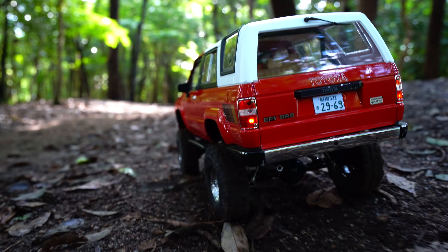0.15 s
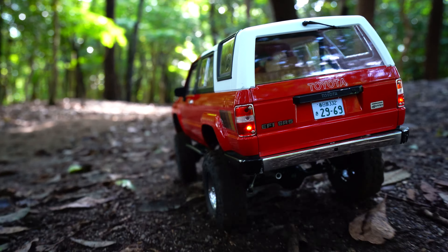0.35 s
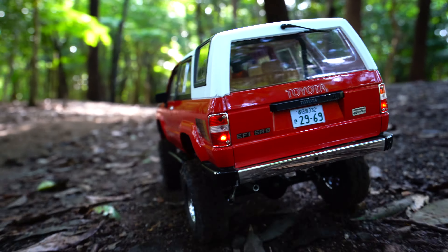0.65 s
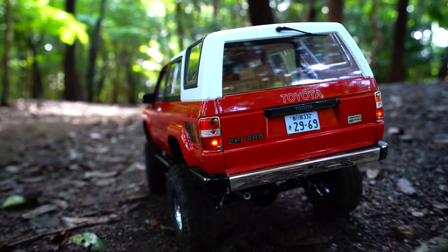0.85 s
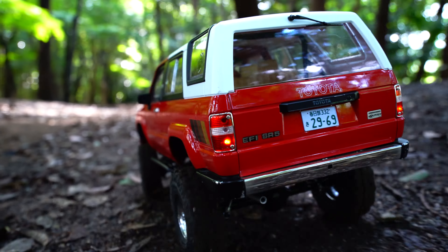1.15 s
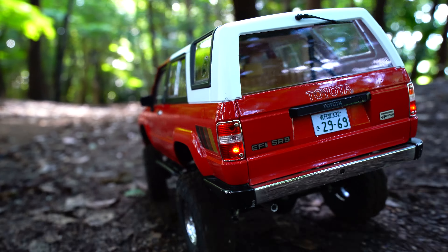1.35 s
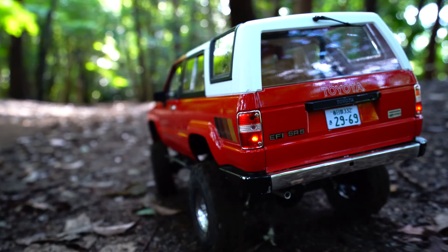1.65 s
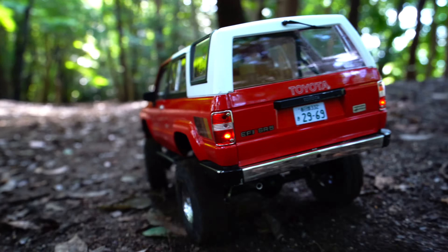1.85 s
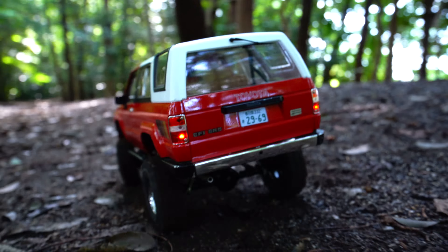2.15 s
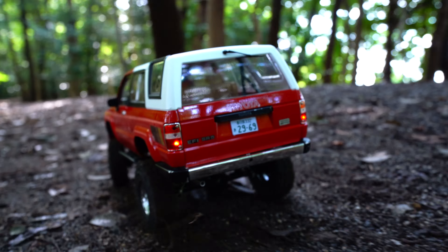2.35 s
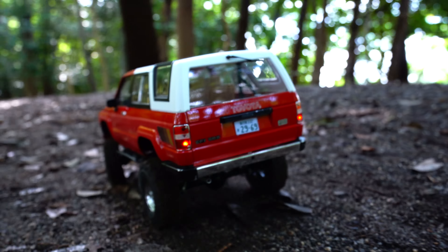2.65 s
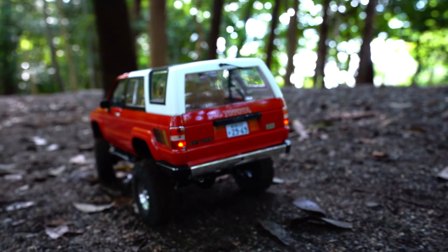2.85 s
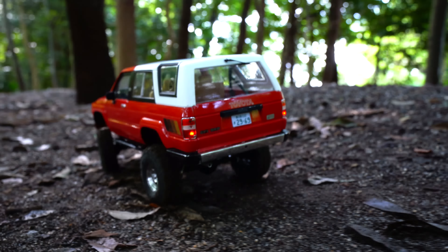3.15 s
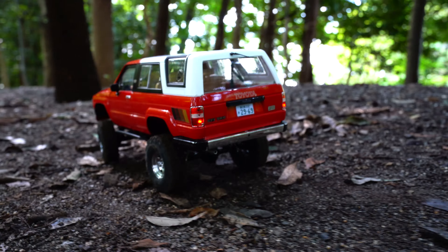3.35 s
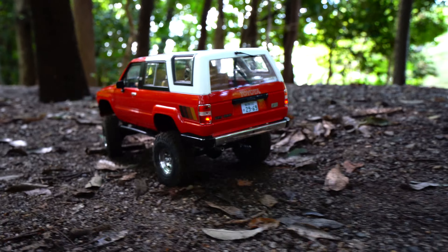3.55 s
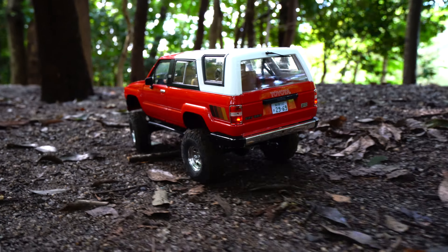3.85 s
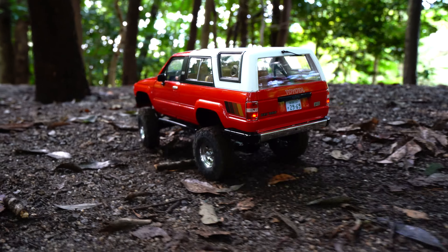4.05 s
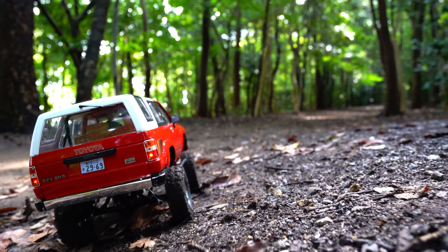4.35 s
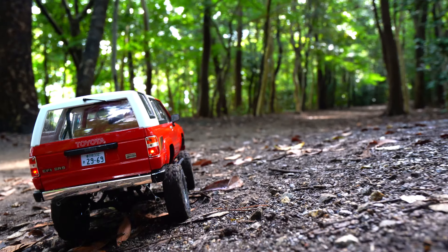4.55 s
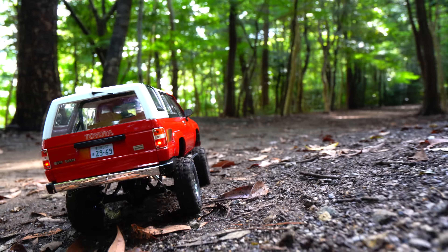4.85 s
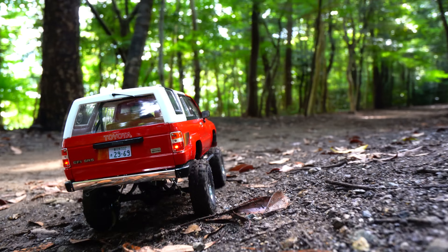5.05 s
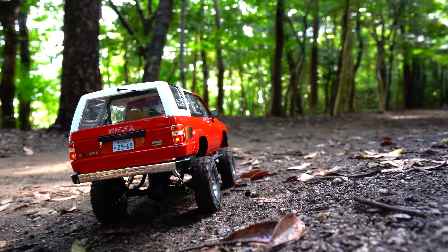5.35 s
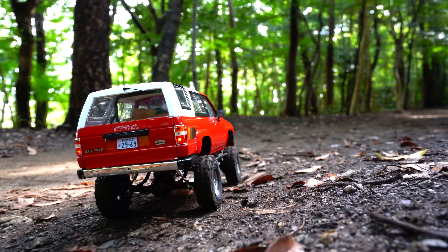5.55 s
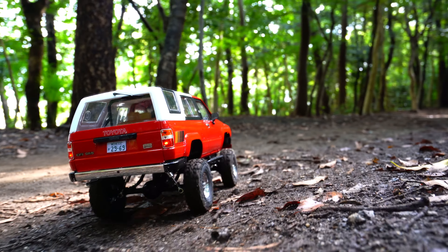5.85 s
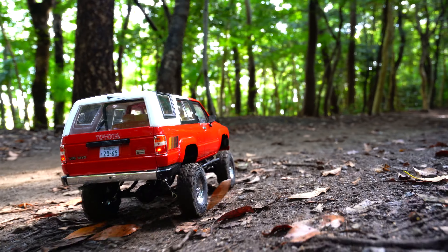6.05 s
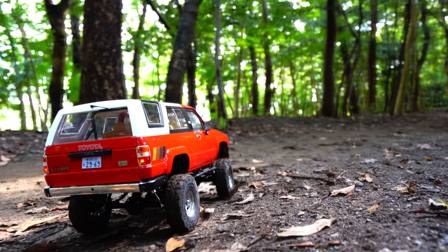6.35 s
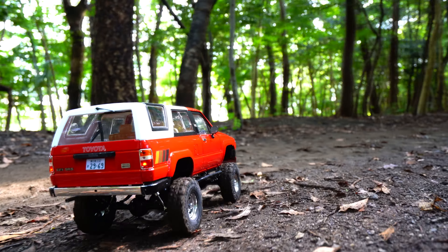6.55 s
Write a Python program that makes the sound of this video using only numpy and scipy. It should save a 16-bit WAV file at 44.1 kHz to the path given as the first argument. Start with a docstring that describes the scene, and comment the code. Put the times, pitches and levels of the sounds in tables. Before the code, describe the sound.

From 0 to 6.7 seconds a dense, high cicada chorus sizzles loudly and almost evenly, over a soft bed of forest air. Beneath it a small electric model truck crawls over soft leafy soil: a thin, wavering gear whine with rapid small surges, low tyre rumble and faint crackle. A light knock comes at 0.2, with duller thuds near 1.2 and 1.4. From 1.5 the whine climbs and rasps, peaking around 1.9, then slides down by 2.7 and keeps fluttering. Soft bumps fall near 2.2. Closer shrill insects gradually join. At 4.3 everything dips for an instant at a cut; then the rolling is grittier. A thin distant cicada winds upward from 4.9. The whine rises again around 5.5 to 5.9, with a sharper plastic knock near 5.75, then drops and wavers to the end. Dry, centred, single microphone.

```python
"""A small electric model truck crawls over a forest floor under a dense cicada chorus, in two scenes.
First soft soil: gears whine with the throttle and rasp under load, tyres rumble, the chassis knocks.
The whine peaks in pitch near 1.9 s; closer insects then slowly join the filtered-click chorus.
At 4.29 s the level dips for an instant at the cut to a second scene, where the rumble is grittier;
a far cicada winds up from 4.9 s. Whine and far cicada are gliding sines, forest is filtered noise."""
import sys
import numpy as np
from scipy import signal
from scipy.fft import rfft, irfft, next_fast_len
from scipy.io import wavfile

SR = 44100
rng = np.random.default_rng(int(sys.argv[2]) if len(sys.argv) > 2 else 0)


def master_out(mix):
    """Clip the mix to full scale and print it as 16-bit PCM to the path in sys.argv[1]."""
    frames = np.transpose(np.atleast_2d(mix))
    ceiling = np.clip(frames, -1, 1)
    pcm = np.round(ceiling * 32767).astype(np.int16)
    wavfile.write(sys.argv[1], SR, pcm)


N = 295029
TIME = np.arange(N) / SR
SCENE_CUT_S = 4.287


def amp(db):
    """Decibels to gain."""
    return 10 ** (np.asarray(db) / 20)


def unit(x):
    """Scales to rms 1."""
    return x / np.sqrt(np.mean(x ** 2) + 1e-20)


def curves(rows):
    """Each column of a table, joined by straight lines in time."""
    s, *columns = np.transpose(rows)
    return [np.interp(TIME, s, column) for column in columns]


def colour(x, points):
    """Filters x by a spectrum, linear in dB over log frequency; rms 1."""
    hz, db = np.transpose(points)
    size = next_fast_len(N, True)
    bin_hz = np.fft.rfftfreq(size, 1 / SR)
    gain = amp(np.interp(np.log(bin_hz + 1), np.log(hz), db))
    return unit(irfft(rfft(x, size) * gain, size)[:N])


def wander(hz):
    """Smooth random drift up to about hz; rms 1."""
    size = next_fast_len(N, True)
    bin_hz = np.fft.rfftfreq(size, 1 / SR)
    gain = 1 / np.sqrt(1 + (bin_hz / hz) ** 4)
    return unit(irfft(rfft(rng.standard_normal(size)) * gain, size)[:N])


def grains(per_s, spread_db):
    """Random clicks of uneven size and either sign; rms 1."""
    size = amp(spread_db * np.minimum(rng.exponential(1, N), 4))
    sign = rng.choice([-1, 1], N)
    return unit(size * sign * (rng.random(N) < per_s / SR))


def resonate(x, hz, width_hz):
    """One resonance of peak gain 1."""
    return signal.lfilter(*signal.iirpeak(hz, hz / width_hz, fs=SR), x)


def bell(s, half_length_s, squareness=1):
    """One smooth swell of height 1, centred on time s; squareness flattens its top."""
    return np.exp(-np.minimum(((TIME - s) / half_length_s) ** 2, 30) ** squareness)


# Gear speed set by the throttle. Each row: time in seconds, tooth rate in Hz.
THROTTLE_CURVE = [(0.0, 654), (0.53, 687), (0.88, 669.6), (1.31, 710.5), (1.54, 783), (1.94, 1142),
                  (2.14, 1024), (2.29, 850), (2.66, 753.6), (3.3, 719), (4.06, 729.5), (4.26, 659.3),
                  (5.03, 640), (5.52, 872.5), (5.91, 869), (6.23, 680), (6.39, 763), (6.69, 748)]
# The motor surges as a wheel comes free, or sags as it snags. Each row: centre in seconds,
# half length in seconds, change of tooth rate in Hz, extra bite in dB, strain in dB.
MOTOR_SURGES = [(0.087, .03, -65.5, -0.5, 0), (0.189, 0.041, 87, 10, 1.5), (.427, 0.038, 47, 4.5, 4),
                (0.765, 0.033, 55, 0, 6), (0.837, .018, -44.5, 2, -4), (0.904, 0.019, -42, 2, 0),
                (1.105, 0.025, 72, 1, 0), (1.248, .035, 87.5, 0.5, 7), (1.371, 0.042, 107, 0, 9),
                (1.484, .027, 93.5, 0.5, 7.5), (1.616, .027, 104.5, -5, -1), (1.665, 0.035, -14.5, -0.5, 5),
                (1.755, 0.025, 81, -2, 1), (2.055, 0.024, -40, -2, -1), (2.205, .02, 25, 6.5, -1),
                (2.45, 0.025, 37, 1, 1), (2.572, 0.033, 71.5, 3.5, 1.5), (2.742, 0.0247, 14.5, 7, -2),
                (2.854, 0.024, 62.5, -1, 8.5), (2.963, .031, 54.5, 5, 1.5), (3.1, 0.04, 76, 0.5, 3),
                (3.182, 0.043, 80, 4.5, -1), (3.307, 0.035, 87.5, 6, 0), (3.479, .055, 53, 9, 3),
                (3.643, 0.027, 99.5, 1.5, 0), (3.852, 0.029, 91.5, 11.5, -2), (4.2, .034, 85.5, 8.5, 0),
                (4.636, .053, 51.5, -2, 0), (4.797, .018, 9, 9, 0), (4.841, .038, 85.5, -3, -3),
                (5.047, 0.059, 128, 0, 12), (5.179, .027, 71, -1, 3), (5.297, .027, 97, 1, 0),
                (5.395, 0.037, 43.5, 2.5, -1), (5.664, .028, -52, 0.5, -1), (5.733, 0.048, 43.5, 3, -4),
                (6.14, 0.048, 71, 1, -1), (6.447, .037, 82, 10.5, 0), (6.576, 0.027, 88.5, 3, -1)]
# A wheel's load comes on and lets go faster than the speed can follow.
LOAD_SQUARENESS = 2
# Whine before shell and load gains. Each row: time in seconds, tone at the tooth rate in dB,
# tooth bite at its octave in dB.
WHINE_LEVELS = [(0, -42.5, -49), (.5, -40.5, -47.5), (.9, -41.5, -49.5), (1.3, -42, -41),
                (1.68, -43, -42.5), (2.1, -42, -46), (2.45, -42.5, -40.5), (2.8, -42.5, -42.5),
                (3.3, -44, -45.5), (3.7, -42.5, -48), (4.05, -38, -48), (4.4, -46.5, -48),
                (5.1, -44.5, -48.5), (5.4, -38, -42.5), (5.96, -42, -45), (6.04, -47, -58),
                (6.42, -40.5, -49.5), (6.69, -43.5, -53)]
# Upper overtones of the bite. Each row: multiple of the tooth rate, relative level in dB.
BITE_OVERTONES = [(3, -8), (4, -10), (5, -10.5), (6, -14.5)]
# Dry scrape of the teeth, louder when the truck is near. Each row: time in seconds, level in dB.
RASP_LEVELS = [(0, -46), (.6, -51), (1.3, -47.5), (1.7, -38.5), (2.55, -42.5), (2.7, -53.5), (3.1, -41),
               (3.4, -58), (4.9, -54), (5.3, -45.5), (5.9, -42), (6.1, -45.5), (6.69, -43.5)]
# The meshing gears sing out for a moment. Each row: centre in seconds, extra tone in dB.
GEAR_SINGS = [(.06, 3.5), (.585, 2.5), (.795, 9), (.905, 5.5), (.97, 6.5), (1.651, 11), (1.79, 10),
              (1.915, 2), (2.01, 5), (2.82, 6), (2.91, 9), (4.04, 5), (4.88, 3), (5.18, 6), (5.72, 1),
              (5.925, 3.5), (6.39, 7.5)]
SING_HALF_LENGTH_S, SING_BITE_SHARE = 0.022, 0.4
# The load swings once per turn of the drive shaft, and the whine throbs with it.
TEETH_PER_TURN = 92
THROB_DB, BITE_THROB_DB, THROB_SAG_FRACTION = 1.55, 2.0, 0.0119


def gears():
    """Meshing teeth sing; load sharpens their contact, adding overtones and a rasp."""
    throttle_hz, = curves(THROTTLE_CURVE)
    tone_db, bite_db = curves(WHINE_LEVELS)
    rasp_db, = curves(RASP_LEVELS)

    mesh_hz, surge_db, strain_db = throttle_hz, 0, 0
    for s, half_length_s, change_hz, extra_bite_db, extra_strain_db in MOTOR_SURGES:
        mesh_hz = mesh_hz + change_hz * bell(s, half_length_s)
        load = bell(s, 0.92 * half_length_s, LOAD_SQUARENESS)
        surge_db = surge_db + extra_bite_db * load
        strain_db = strain_db + extra_strain_db * load

    shaft_angle = 2 * np.pi * np.cumsum(mesh_hz) / TEETH_PER_TURN / SR
    throb = np.sin(shaft_angle + .7 * wander(hz=4.06))
    sing_db = sum(db * bell(s, SING_HALF_LENGTH_S) for s, db in GEAR_SINGS)
    tone_db = tone_db + sing_db + shell(mesh_hz) + THROB_DB * throb
    bite_db = bite_db + surge_db + SING_BITE_SHARE * sing_db + BITE_THROB_DB * throb

    # the speed trembles as the tread grips and slips
    tremble = .014 * wander(hz=35)
    tooth_hz = mesh_hz * (1 + tremble - THROB_SAG_FRACTION * throb)
    angle = 2 * np.pi * np.cumsum(tooth_hz) / SR
    # the twelve-tooth pinion runs slightly off centre, once a turn
    angle = angle + .15 * np.sin(angle / 12 + .6 * wander(hz=12))

    # uneven teeth make the contact flutter
    flutter_db = 1.4 * wander(hz=60)
    tone_gain = amp(tone_db - 0.85 + flutter_db + 3.0 * wander(hz=55))
    tone = tone_gain * np.sin(angle + 0.33 * wander(hz=45))
    octave_gain = amp(bite_db + shell(2 * mesh_hz) - 1.3 + flutter_db + 2 * wander(hz=59.6))
    octave = octave_gain * np.sin(2 * angle + 0.083 * wander(hz=90))

    # backlash smears the upper overtones
    upper = 0
    for multiple, db in BITE_OVERTONES:
        gain = amp(db + 2 * wander(hz=80))
        upper = upper + gain * np.sin(np.round(multiple) * angle + .22 * wander(hz=110))
    # like the scrape, they carry only while the truck is near
    near_db = .5 * (rasp_db - np.mean(rasp_db))
    upper = amp(bite_db + 3.5 + near_db + strain_db + flutter_db) * casing(upper)

    # the scrape swells once per tooth as it engages
    scrape = unit(casing(rng.standard_normal(N) * (1 + 0.49 * np.cos(angle))))
    rasp = amp(rasp_db + 0.5 * strain_db + flutter_db) * scrape
    return np.sqrt(2) * (tone + octave + upper) + rasp


# Gearbox casing. Each row: resonance in Hz, width of one pass in Hz, gain in dB.
CASING_BANDS = [(820, 340, -4.5), (1150, 430, -8), (1650, 590, 1), (2146, 140, -4), (2423, 360, -1.5),
                (3640, 690, -3), (4920, 870, 0.5)]


def casing(x):
    """The gearbox rings in a few fixed bands, so overtones flare as they glide through them."""
    out = 0
    for hz, width_hz, db in CASING_BANDS:
        out = out + amp(db) * resonate(resonate(x, hz, width_hz), hz, width_hz)
    return out


# How well the body shell radiates the whine. Each row: frequency in Hz, gain in dB.
SHELL_GAINS = [(630, 4.5), (700, -1), (780, -1.5), (850, -0.5), (900, 3), (1000, 3.5), (1050, 3.3),
               (1110, 5.5), (1280, -2), (1400, -3.5), (1530, 0.5), (1650, 3.4), (1950, 0), (2100, -1.5),
               (2240, 4)]


def shell(hz):
    """The body shell's gain in dB for a tone that glides along hz."""
    return np.interp(hz, *np.transpose(SHELL_GAINS))


# Tyres on the ground, before the trim per scene. Each row: time in seconds, rumble in dB.
ROLL_LEVELS = [(0, -41.5), (1.2, -37.5), (1.75, -36), (1.9, -40), (2.25, -38), (2.5, -40.5), (3.3, -42.5),
               (4.0, -43), (4.23, -40), (4.3, -45), (5.25, -45), (5.5, -45), (5.9, -43.5), (6.69, -41.5)]
# Rumble through the shell on soft soil. Each row: frequency in Hz, relative density in dB per Hz.
SOIL_SPECTRUM = [(30, -19), (70, -7), (120, -6.5), (180, 2.5), (250, 1.5), (340, -4), (480, -9), (700, -27),
                 (1500, -37), (4000, -62)]
# Rumble through the shell on hard grit. Each row: frequency in Hz, relative density in dB per Hz.
GRIT_SPECTRUM = [(30, -32), (80, -9.5), (150, 2), (220, -4), (300, -11.5), (400, -4.5), (520, -21),
                 (800, -12), (1500, -43), (4000, -60)]


def tyres():
    """Tread blocks patter on the ground and boom in the shell; grit and dry leaves crackle faintly."""
    roll_db, = curves(ROLL_LEVELS)
    lumps_db = 0.97 * wander(hz=9)
    patter = grains(per_s=1400, spread_db=2.5)
    on_soil = amp(-1.1) * colour(patter, SOIL_SPECTRUM)
    on_grit = amp(-4.0) * colour(patter, GRIT_SPECTRUM)
    rumble = np.where(TIME < SCENE_CUT_S, on_soil, on_grit)
    crackle_spectrum = [(300, -20), (1000, -16), (4000, 17), (12500, 1), (16000, -12)]
    crackle = colour(grains(per_s=500, spread_db=15.0), crackle_spectrum)
    return amp(roll_db + lumps_db) * (rumble + amp(-13.5) * crackle)


# Chassis knocks. Each row: start in seconds, level in dB, pitch in Hz, 60 dB decay time in seconds.
CHASSIS_KNOCKS = [(.205, -22, 397, 0.017), (1.17, -24.5, 240, 0.099), (1.43, -26, 160.7, 0.075),
                  (1.775, -31, 95.3, 0.073), (1.8, -33, 171, .07), (2.233, -31, 164, 0.078),
                  (2.244, -31.5, 78, 0.15), (4.787, -28, 379, 0.023), (5.284, -25.5, 175.3, 0.038),
                  (5.7442, -16.5, 428.6, 0.0091), (5.759, -29, 313, 0.022), (5.788, -23, 463, 0.022),
                  (6.27, -36, 150, 0.089), (6.6, -34, 115.6, .12)]


def knocks():
    """The suspension bottoms on bumps: short, heavily damped thuds with a plastic overtone."""
    out = np.zeros(N)
    t = np.arange(SR // 4) / SR
    attack = 1 - np.exp(-t / 0.00026)
    for s, db, hz, t60_s in CHASSIS_KNOCKS:
        ring = np.sin(2 * np.pi * hz * t) + amp(-8.5) * np.sin(2 * np.pi * hz * 1.85 * t)
        thud = amp(db - 60 * t / t60_s) * ring * attack
        part = out[round(s * SR):][:len(t)]
        part += thud[:len(part)]
    return out


# Chorus, high voice. Each row: time in seconds, rms level in dB.
HIGH_CHORUS_LEVELS = [(0, -20), (1.08, -19), (1.5, -20.5), (3.05, -19.5), (3.45, -20.8), (4.2, -19.5),
                      (4.35, -20.5), (6.69, -19.9)]
# Chorus, low voice. Each row: time in seconds, rms level in dB.
LOW_CHORUS_LEVELS = [(0, -32.5), (1.0, -29.5), (2.8, -26.3), (3.3, -28), (5.5, -31), (6.69, -31.5)]
# High voice. Each row: frequency in Hz, relative density in dB per Hz.
HIGH_CHORUS_SPECTRUM = [(3000, -34.5), (5000, -21), (6200, -10.5), (6900, -2.5), (7600, 0.5), (8200, 1),
                        (8800, -1), (9400, -7.5), (10000, -14.5), (11000, -24), (11800, -28.5),
                        (13200, -30), (14500, -33), (15800, -39)]
# Low voice. Each row: frequency in Hz, relative density in dB per Hz.
LOW_CHORUS_SPECTRUM = [(2500, -43), (4000, -27), (4900, -28), (5300, -12), (5700, -4.5), (6100, 0),
                       (6500, 0), (7100, -11.5), (8000, -21), (10000, -50)]


def cicadas():
    """Countless tymbal clicks merge into a sizzle, in a high and a lower voice."""
    high_db, = curves(HIGH_CHORUS_LEVELS)
    low_db, = curves(LOW_CHORUS_LEVELS)
    high_gain = amp(high_db + 0.3 * wander(hz=25))
    high = high_gain * colour(grains(per_s=20000, spread_db=0.4), HIGH_CHORUS_SPECTRUM)
    low_gain = amp(low_db + .5 * wander(hz=21))
    low = low_gain * colour(grains(per_s=15000, spread_db=.5), LOW_CHORUS_SPECTRUM)
    return high + low


# A near group joins the chorus. Each row: time in seconds, rms level in dB.
NEAR_LEVELS = [(0, -55), (1.5, -47), (3.0, -42), (4.2, -35.5), (4.4, -34.5), (5.3, -32.5), (5.9, -35),
               (6.69, -40)]
# Its narrow bands. Each row: centre in Hz, width of one pass in Hz, gain in dB.
NEAR_BANDS = [(5673, 340, -3), (5205, 130, -7)]


def near_insects():
    """A few closer insects add a shrill edge just under the chorus: clicks ring in narrow bands."""
    level_db, = curves(NEAR_LEVELS)
    clicks = grains(per_s=9800, spread_db=-0.3)
    voice = 0
    for hz, width_hz, db in NEAR_BANDS:
        voice = voice + amp(db) * resonate(resonate(clicks, hz, width_hz), hz, width_hz)
    return amp(level_db) * unit(voice)


# One far cicada winds up. Each row: time in seconds, reference pitch in Hz, level in dB.
SOLO_CURVE = [(4.9, 3695, -72), (5.25, 3785, -51), (5.8, 4055, -49), (6.2, 4270, -49), (6.5, 4393, -55),
              (6.69, 4340, -45)]
# Its tones. Each row: multiple of the reference pitch, relative level in dB.
SOLO_PARTIALS = [(.92, -12), (1, 2), (1.087, 6)]


def solo_cicada():
    """Thin, fuzzy tones climb slowly below the chorus; at the end pitch slips a little, level swells."""
    hz, level_db = curves(SOLO_CURVE)
    angle = 2 * np.pi * np.cumsum(hz) / SR
    tones = 0
    for multiple, db in SOLO_PARTIALS:
        gain = amp(db + 2 * wander(hz=22))
        tones = tones + gain * np.sin(multiple * angle + 0.44 * wander(hz=25))
    return amp(level_db) * unit(tones)


# Forest background. Each row: frequency in Hz, relative density in dB per Hz.
FOREST_SPECTRUM = [(15, -2), (30, 2), (55, -5.5), (120, -3), (300, -0.5), (600, -1.5), (1000, -3),
                   (1500, -3.5), (2200, -7), (2900, -11), (3600, -6), (4600, -6), (7000, -9), (16000, -34)]
FOREST_DB = -41


def forest():
    """Soft, even background of air and leaves: filtered noise."""
    gain = amp(FOREST_DB + 1.6 * wander(hz=6.7))
    return gain * colour(rng.standard_normal(N), FOREST_SPECTRUM)


def scene():
    """Truck, insects and forest reach one microphone, alike in both ears."""
    truck = gears() + tyres() + knocks()
    insects = cicadas() + near_insects() + solo_cicada()
    mono = truck + insects + forest()
    return np.array([mono, mono])


def record(dry):
    """The level dips for an instant at the cut to the second scene; then a steep treble limit."""
    edge_hz, dip_half_length_s = 15780, .006
    dip = np.minimum(abs(TIME - SCENE_CUT_S) / dip_half_length_s, 1)
    lowpass = signal.firwin(1201, edge_hz, window=("kaiser", 9), fs=SR)
    return signal.oaconvolve(dry * dip, lowpass[None], "same")


dry = scene()
out = record(dry)
master_out(out)
```